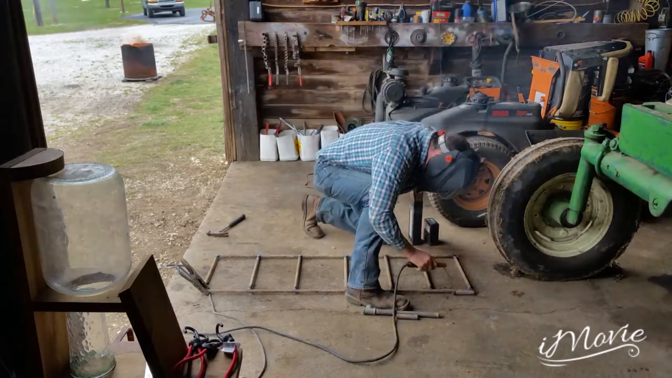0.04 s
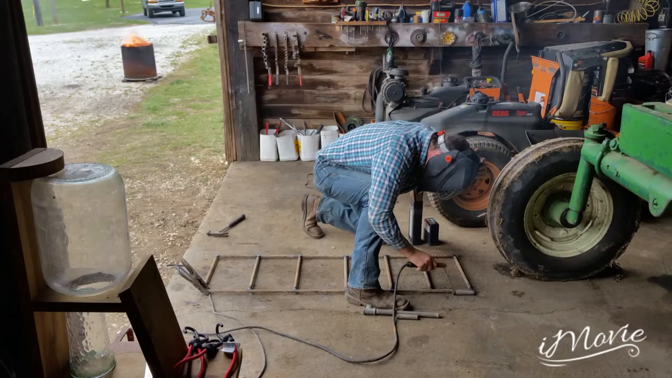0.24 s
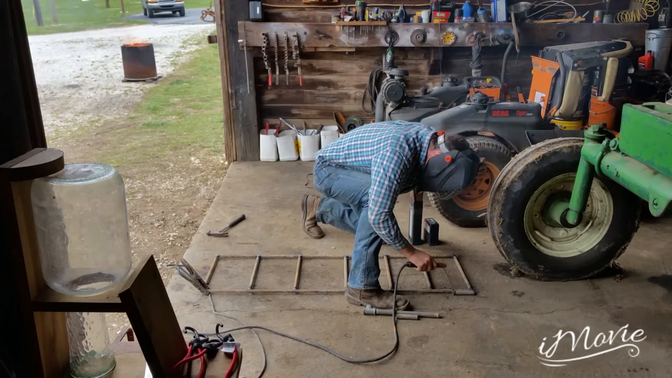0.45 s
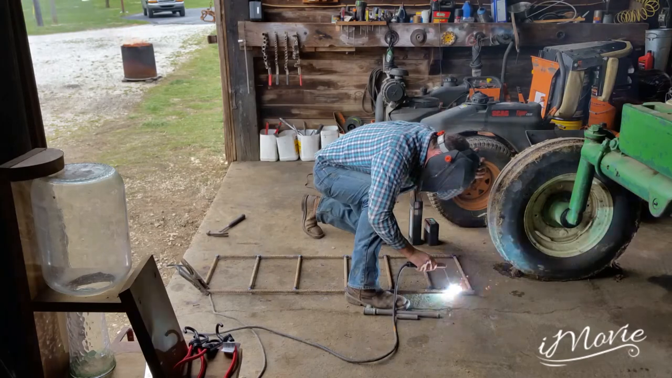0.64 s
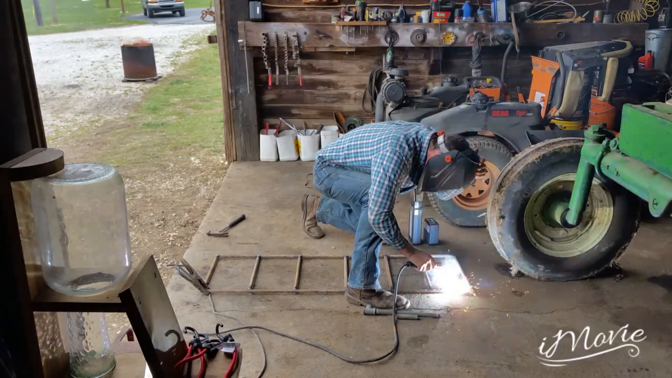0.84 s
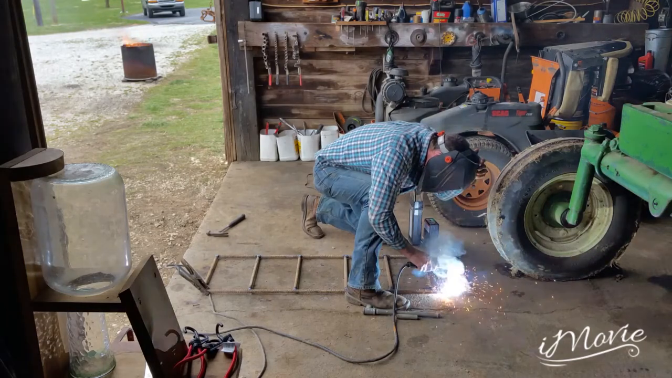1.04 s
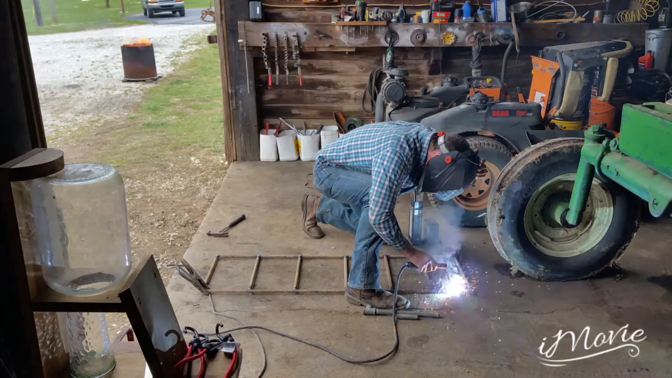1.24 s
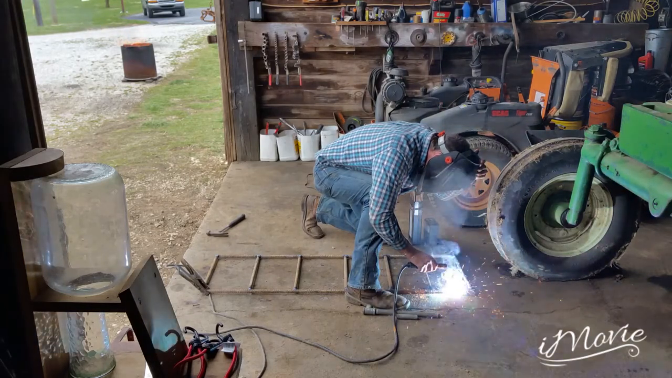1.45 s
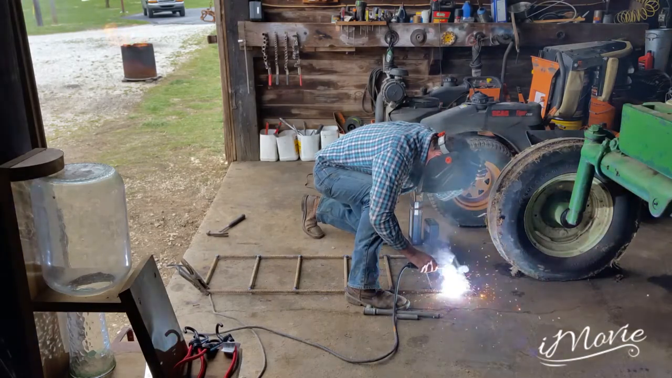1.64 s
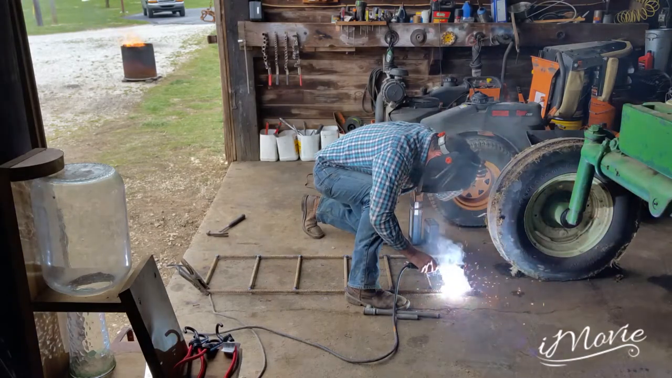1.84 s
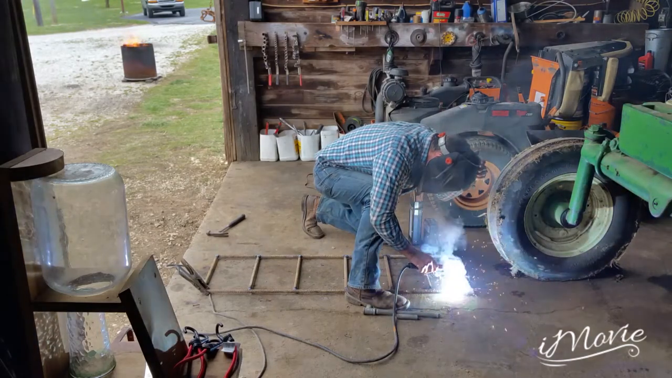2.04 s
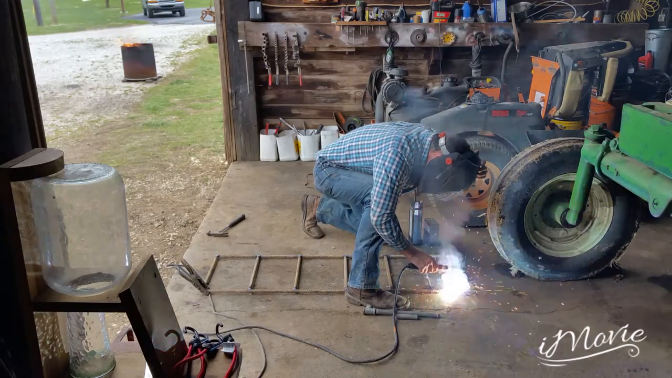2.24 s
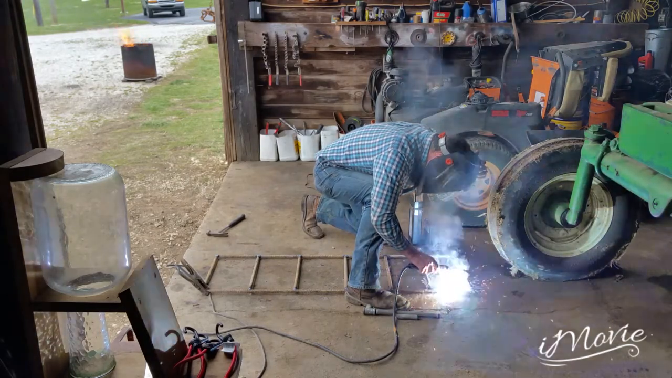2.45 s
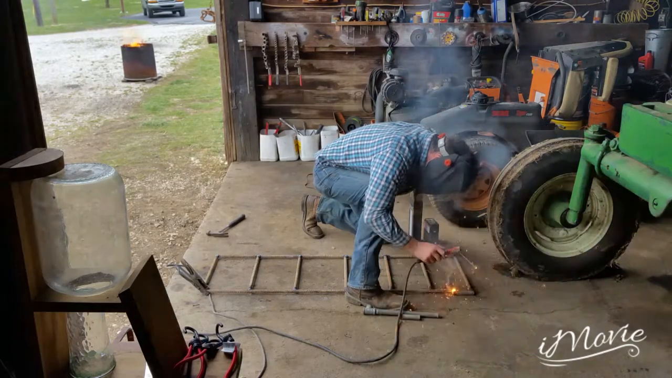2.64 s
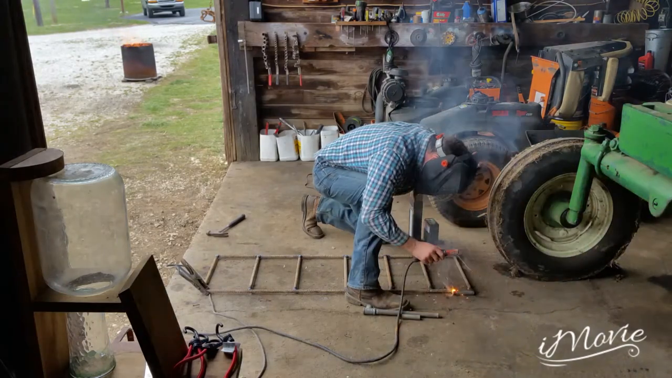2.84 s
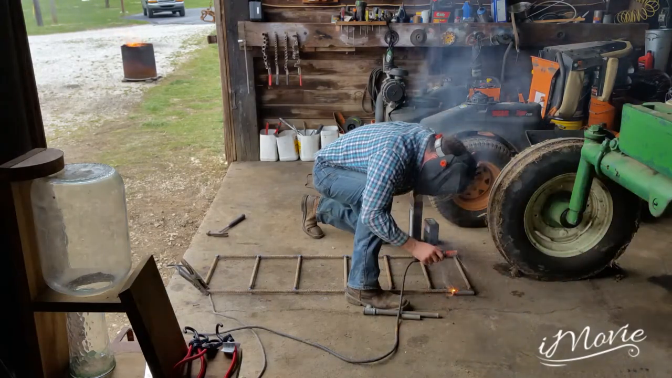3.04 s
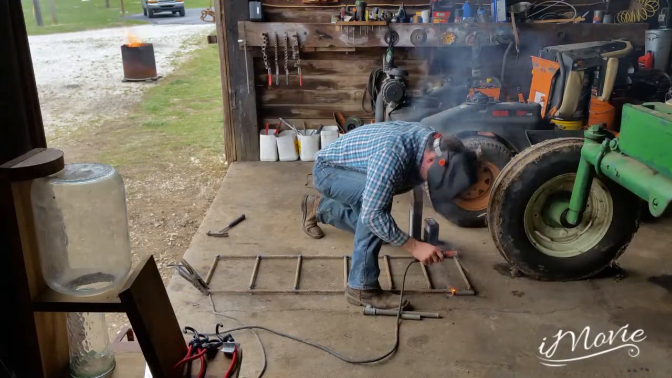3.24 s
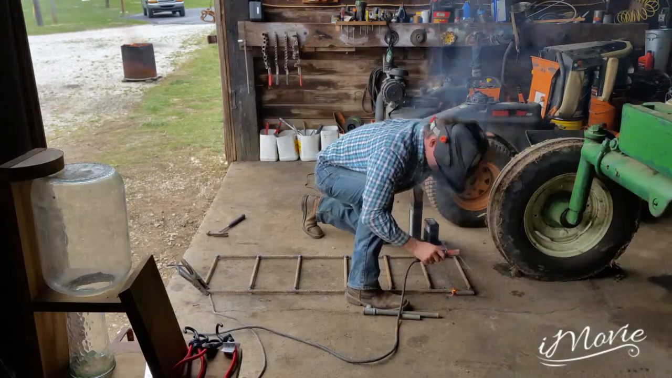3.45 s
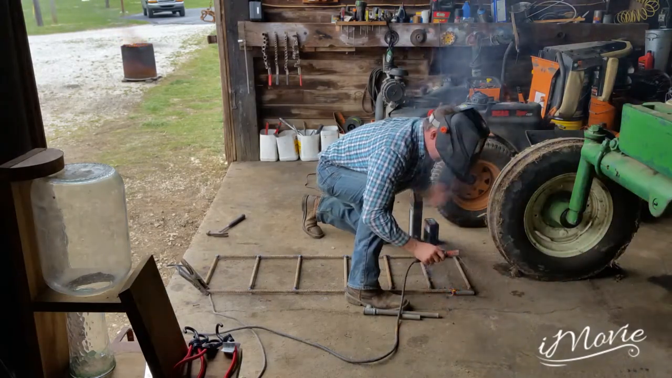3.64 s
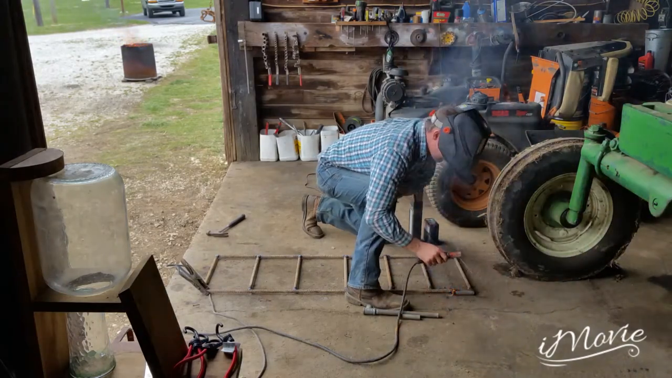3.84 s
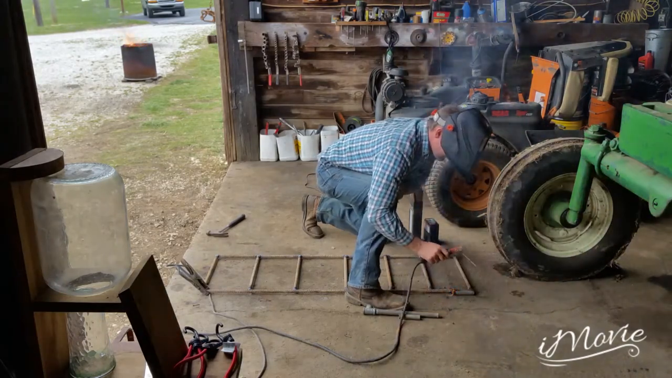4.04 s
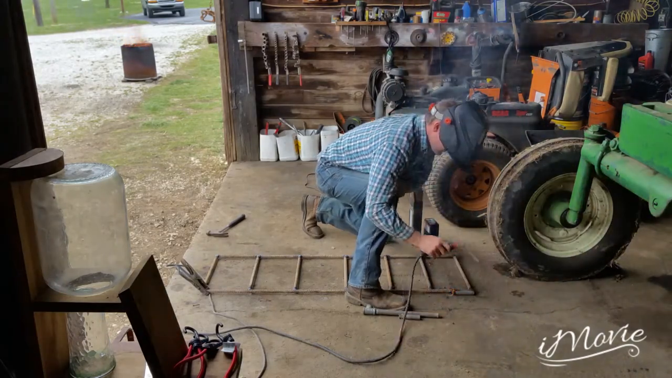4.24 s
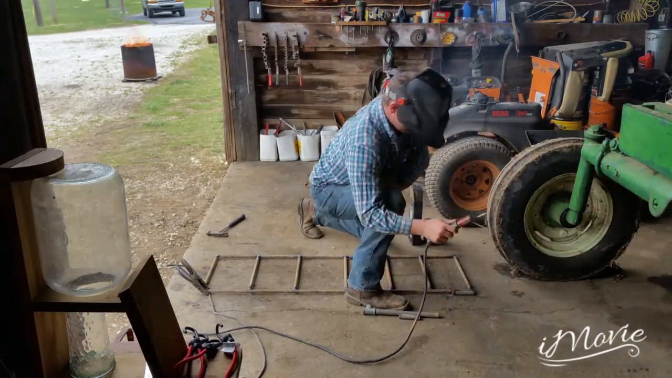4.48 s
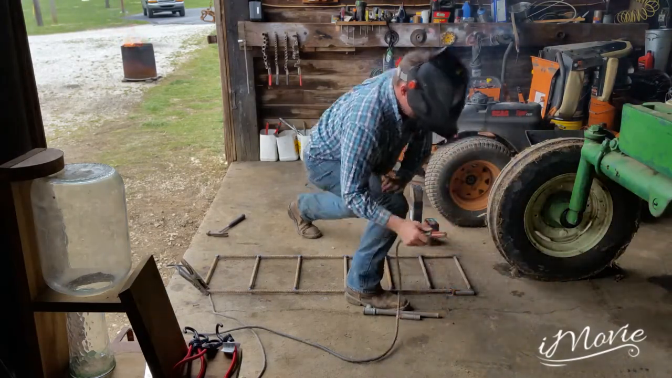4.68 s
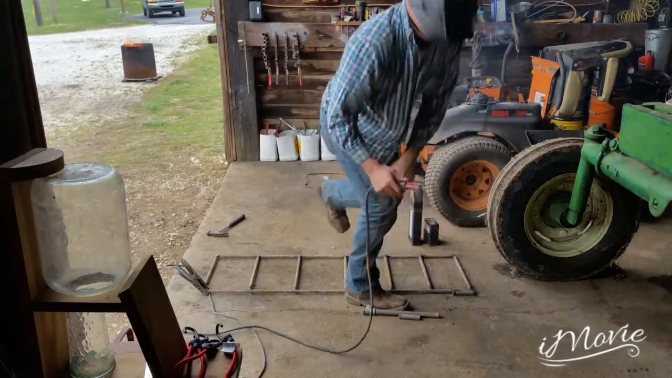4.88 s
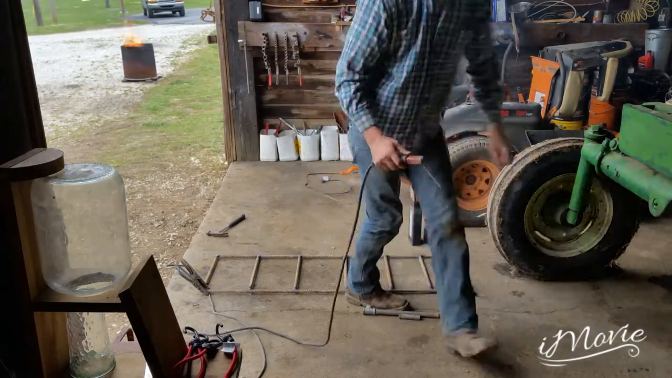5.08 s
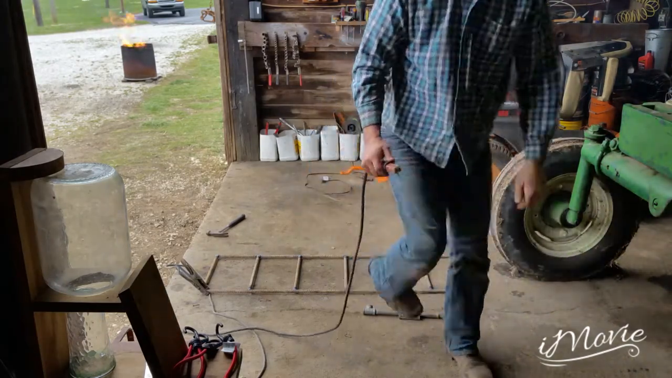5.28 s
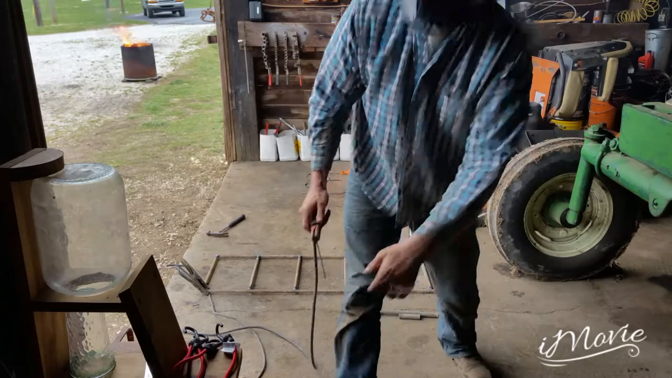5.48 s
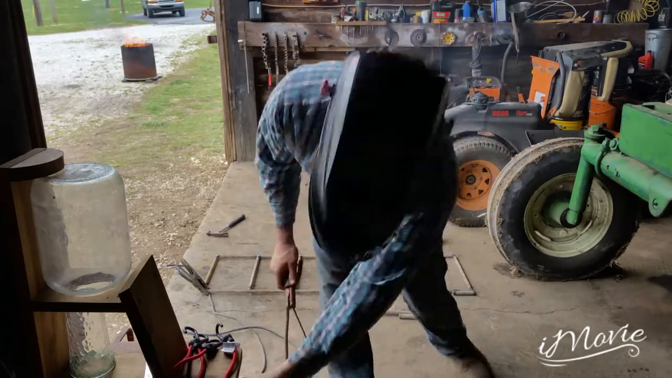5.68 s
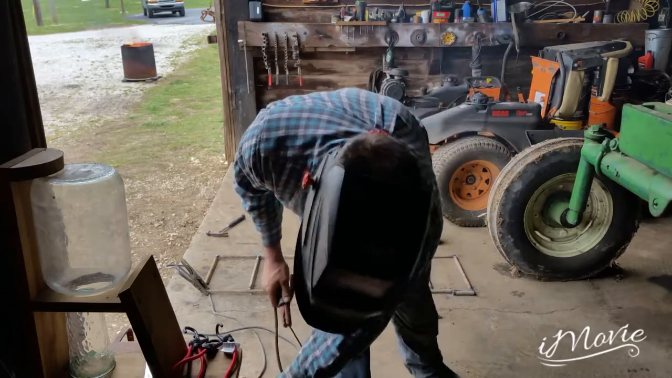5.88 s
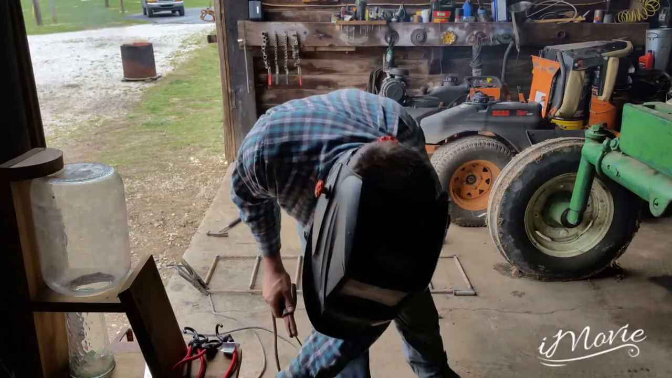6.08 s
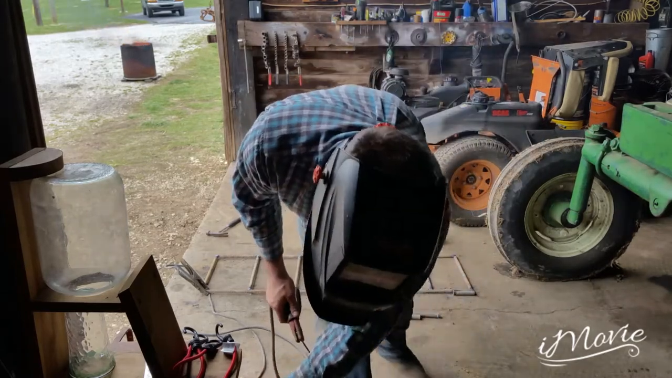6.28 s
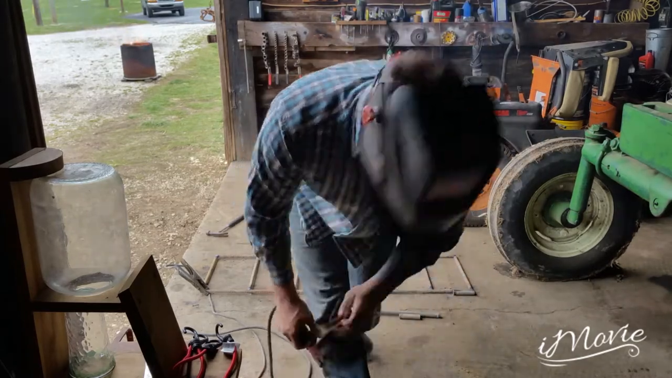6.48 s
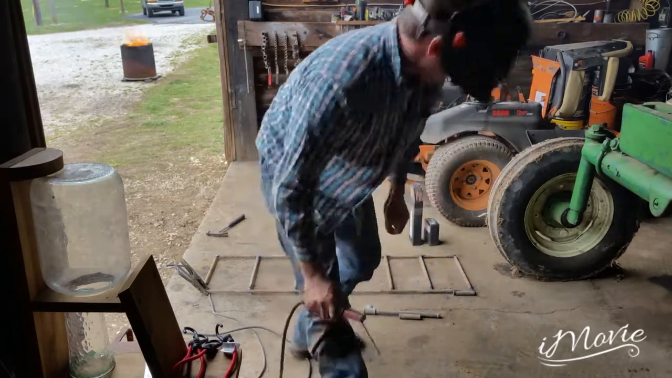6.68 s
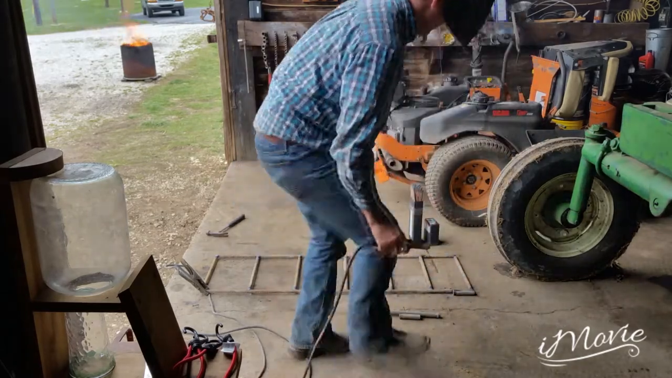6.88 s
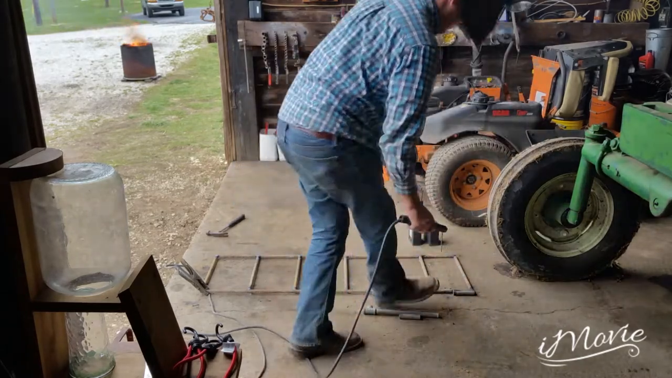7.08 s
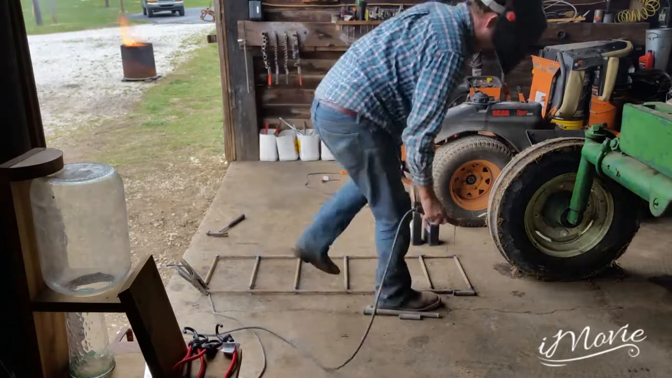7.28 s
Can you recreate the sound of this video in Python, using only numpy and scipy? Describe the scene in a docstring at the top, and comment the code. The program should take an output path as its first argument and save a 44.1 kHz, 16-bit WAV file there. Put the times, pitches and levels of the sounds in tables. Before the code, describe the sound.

From the start a welding transformer gives a steady low-to-mid electrical hum, with a fan's whirring tones and a soft rush of cooling air. At 0.63 seconds the arc strikes: a snap and rough sputter, a brief roaring flare near 0.78, then dense, raspy crackling pulsing at a fast mains buzz. From about 1.03 the bright fizz grows stronger. Irregular sharp pops spit throughout, notably near 1.3 and 1.9, while the hum is louder and the fan sags slightly in pitch. A last roaring flutter ends the arc at 2.52. The fan recovers and idle drone continues. Very faint scuffs of clothes, boots and cable come around 4.8, 5.2 and 5.45. At 5.95 and 6.10 two loud metal switch clacks strike close by, each with a dull rebound and short steel-case ring. Hum and fan run on to the end near 7.4, a faint lower throb growing.

```python
"""Stick welder in a wooden workshop

The transformer hums as a stack of sines; fan and motor whir as sines over a rush of filtered noise.
The struck arc is random sparks that swell with the mains, with drop bursts and noise flares up to its break.
Then come faint rustles of grainy noise as the worker gets up and turns the current switch two notches;
each notch is a clack of shaped noise with a dull rebound and ringing modes of the steel case."""
import sys
import numpy as np
from scipy import signal
from scipy.fft import rfft, irfft, next_fast_len
from scipy.io import wavfile
from scipy.ndimage import map_coordinates

SR = 44100
rng = np.random.default_rng(int(sys.argv[2]) if len(sys.argv) > 2 else 0)


def dump_mix(stems):
    """Bounce the given channels to the path in sys.argv[1] as a 16-bit WAV at rate SR."""
    frames = np.atleast_2d(stems).T  # one column per channel
    limited = np.clip(frames, -1, 1)  # hard clip at full scale
    pcm = np.round(limited * 32767).astype(np.int16)
    wavfile.write(sys.argv[1], SR, pcm)


N = 322812
TIME = np.arange(N) / SR

STRIKE_S, BREAK_S = 0.63, 2.521  # the arc burns between these times
MAINS_HZ = 60

# the core's two main partials: (multiple of the mains, idle level [dB], loaded level [dB],
# extra on the cold rod [dB], extra in a full surge [dB], left-right [dB])
CORE = [(4, -43.5, -35, 4, 9.5, 0), (8, -47, -50, 13, 11.5, 1)]
# heavy current on the cold rod, one row per main partial: (peak time [s], half length [s])
INRUSH = [(0.732, 0.1), (0.907, 0.17)]
# the current surges as the arc takes hold and before it breaks: (time [s], half length [s], strength [0-1])
SURGES = [(0.779, 0.0062, .55), (2.507, 0.018, 0.95)]
# the hum's weaker partials: (multiple of the mains, idle level [dB], loaded level [dB],
# left-right before the common shift [dB])
HUM_PARTIALS = [(12, -49.5, -46.5, 2), (16, -62.5, -58.5, 10), (20, -64, -50.5, 5), (32, -68, -60, 7)]
EASE_S, EASE_HALF_S, EASE_DB = 1.3, 0.072, -4.5  # the main partials ease briefly in mid-weld
THROB_DB, THROB_RISE_S = -46.5, 0.7  # a lower tone that grows against the hum once the switch is turned

# whirring tones of the fan, its blade tone first, and of a second motor (682 Hz) that slows less:
# (idle frequency [Hz], level [dB], left-right before the common shift [dB],
# idle left lead [rad], share of speed lost under load)
WHIR_TONES = [(409.5, -41, 9.5, 1.83, .012), (206, -58, 9.5, 0, 0.01207), (544, -54.5, -5, 0.13, .012),
              (682, -47.5, 11, -0.23, 0.003994), (823.4, -50, -5, 1, .012), (1225, -52, -7.5, 0.43, .012),
              (1685, -56, 0, 0, .012)]
# slow swells and fades of the blade tone: (time [s], half length [s], change [dB])
BLADE_SWELLS = [(4, 0.62, -2), (6.4, 0.33, 2.5), (7.1, 0.34, -3.5)]
BLADE_LOAD_DB = 1.5  # the blade tone is louder under load
# spectrum of the cooling air: (frequency [Hz], density [dB per Hz])
AIR = [(25, -31), (60, -18.5), (110, -11.5), (200, -3.5), (300, 1), (540, -2), (800, 2), (1050, -6),
       (1700, -5), (2800, -15), (6500, -19), (8000, -22.5), (14300, -25.5), (16000, -37)]
# resonances of the air's way through the case, and a bright peak near 14 kHz: (frequency [Hz], width [Hz], gain
# [dB])
DUCT = [(518, 103, 6.1), (697, 70, 5.4), (1297, 237, 6.4), (1717, 51, 2.6), (2395, 240, 5.5),
        (3490, 340, 3.7), (10160, 900, 1.9), (14100, 700, 2.5)]
AIR_DB = -38

# how hard the arc crackles as the hand guides the rod: (time [s], level [dB])
CRACKLE_LEVEL = [(0.65, -31), (0.694, -37), (0.704, -31), (1.02, -34.5), (1.632, -30.5), (2.154, -32),
                 (2.16, -34.5), (2.47, -31.5)]
# spectrum of the crackle: (frequency [Hz], density [dB per Hz])
CRACKLE = [(40, -50), (150, -46), (450, -1.5), (900, -6.5), (1300, -0.5), (2000, -1), (3000, -0.5),
           (4500, 0), (7000, -2.5), (9000, -4), (11000, -15), (15000, -35)]
# spectrum of the fizz: (frequency [Hz], density [dB per Hz])
FIZZ = [(300, -60), (6000, -13), (9000, -5), (11500, -1), (14200, 0.5), (15200, -7.5), (16200, -10)]
# colour of frame and floor: (frequency [Hz], width [Hz], gain [dB])
FRAME = [(1438, 113, 4.5), (1535, 89, -14), (1840, 200, 3), (2190, 170, -4), (2470, 140, 0.5),
         (2700, 220, 0.5), (3160, 230, 6), (3370, 100, -9), (3750, 280, 5.5), (4190, 330, -5.5),
         (6000, 200, -3), (6860, 230, 6), (7450, 300, -3)]
# how strongly the sparks follow the mains: (at the strike [dB], at the break [dB])
PULSE_DB = (2, 4)
CURRENT_LAG_S = 0.00043  # the arc current trails the mains voltage
# the fizz steps up once the rod is hot
HOT_S, HEATING_S, COLD_FIZZ_DB, HOT_FIZZ_DB = 1.03, 0.027, -36.5, -32
LIFT_S = 2.47  # the rod is drawn away and the fizz dies down

# the largest molten drops short the arc and burst:
# (time [s], snap level before the common gain [dB], crackle level before the common trim [dB])
DROPS = [(0.63, -19.5, -29), (0.7046, -20, -19.5), (0.8448, -19.5, -22), (0.9183, -21, -30),
         (1.049, -18, -36), (1.0758, -19, -34), (1.263, -15.5, -18), (1.301, -15.5, -38),
         (1.5168, -18, -28), (1.5677, -24, -26), (1.7168, -18, -29), (1.8091, -22, -26), (1.884, -18, -27),
         (1.901, -12, -26), (2.0351, -16, -22.5), (2.0925, -17, -31), (2.2337, -20, -31),
         (2.2915, -17, -25), (2.309, -17, -31), (2.3828, -18, -30), (2.4256, -15, -27), (2.45, -19, -29),
         (2.4836, -21, -26)]
# spectrum of the bursts: (frequency [Hz], density [dB per Hz])
DROP_BURST = [(40, -36), (200, -29), (900, -12), (3000, -2.5), (8000, 0), (13500, 5.5), (16000, -7)]
SHORT_S, SHORT_DB = 0.0094, -2  # a drop bridges the gap and muffles the arc just before it bursts

# the arc stretches and its gas flutters: (time [s], half length [s], roar level [dB], sputter level [dB])
FLARES = [(0.636, 0.0044, -39, -34), (0.763, 0.045, -41, -34), (0.748, 0.0027, -42, -34),
          (0.775, 0.006, -29, -32), (0.792, 0.0042, -37, -31), (2.49, 0.007, -45, -30),
          (2.511, 0.014, -28.5, -32)]
# spectrum of the roar: (frequency [Hz], density [dB per Hz])
ROAR = [(30, -32), (65, -20), (120, -3.5), (240, 8.5), (400, -6.5), (800, -3), (2000, -28)]
# spectrum of the sputter: (frequency [Hz], density [dB per Hz])
SPUTTER = [(40, -40), (200, -18), (500, 4.5), (700, 0.5), (1000, -2.5), (1350, 4.5), (1900, 2),
           (2500, -7.5), (3600, -9), (5100, -4.5), (6200, -22), (9000, -22)]

# clothes, boots and cable: (time [s], half length [s], centre [Hz], width [octaves], level [dB])
RUSTLES = [(3.225, .005, 9000, .8, -52), (4.797, .008, 3050, .04, -46), (4.833, .012, 5800, .04, -51),
           (5.196, 0.036, 4300, 0.45, -49.5), (5.2, .03, 3650, .03, -56), (5.195, .025, 4250, .05, -54),
           (5.195, .016, 10000, .7, -49), (5.448, .0035, 10000, 0.7, -40), (5.81, .03, 8000, .8, -59),
           (7.19, .01, 12000, .5, -55)]

# notches of the current switch, levels before the common clack gain:
# (time [s], snap level [dB], rebound time [s], rebound level [dB])
NOTCHES = [(5.9465, -15, 5.963, -29.5), (6.098, -15, 6.118, -23.5)]
# spectrum of the clack: (frequency [Hz], density [dB per Hz])
CLACK = [(30, -32), (100, -17), (250, -11), (500, -8), (900, 0), (1300, -7.5), (2300, -5), (3000, -7),
         (3800, -8), (5000, -10), (8000, -12.5), (13500, -16.5), (16000, -19)]
# broad resonances of the switch housing: (frequency [Hz], width [Hz], first notch [dB], second notch [dB])
HOUSING = [(526, 97, 6, 8), (960, 86, -1, 4), (2250, 200, 0, 3), (2560, 220, 3.5, 3.5),
           (2950, 330, -6.5, -1), (3520, 300, 5.5, -2), (3780, 300, 0, 5.5), (4400, 300, 1, -2),
           (4750, 300, 0, 3), (5800, 400, 5, -2), (6260, 450, 2, 4.5), (13600, 1400, 5, 2)]
# spectrum of the rebound: (frequency [Hz], density [dB per Hz])
REBOUND = [(40, -22), (110, -16), (260, -6.5), (700, 3), (1800, -3), (4000, -14), (12000, -30)]
# ringing of the steel case, relative to the snap level in NOTCHES:
# (frequency [Hz], t60 [s], first notch [dB], second notch [dB])
CASE = [(52, 0.61, -44, -38), (273, 0.41, -13.5, -19.5), (426, 0.14, -28, -8.5), (515, 0.25, -6, -9),
        (551, 0.61, -15, -23), (644, 0.28, -13, -13), (713, 0.15, -12, -4.5), (955, 0.23, -8, -5.5),
        (1455, .17, -26, -10), (1870, .18, -20, -13), (1990, .18, -17, -12), (2210, .2, -17, -11),
        (2580, .18, -15, -16), (3360, .16, -16, -24), (3520, 0.12, -7, -24), (3800, 0.15, -25, -14)]

# decay of the workshop: (frequency [Hz], t60 [s])
SHOP = [(100, 0.62), (500, 0.25), (2000, 0.19), (6000, 0.17), (14000, 0.12)]
# width of diffuse sound: (frequency [Hz], side-mid [dB])
WIDTH = [(40, -3), (130, -24), (260, -7), (600, -11.5), (1300, -3), (3000, -1), (7000, 0)]
# balance of the two ports: (frequency [Hz], left-right [dB])
PORTS = [(100, 1), (500, 2), (1300, -.5), (4500, 1.5), (10500, -1), (12400, -12), (14000, -17.5),
         (15800, -10)]
TOP_HZ = 15900  # band limit
# the sparks' delay at the left port, and the delay of their first echo
LEFT_LAG_S, ECHO_S = 0.00006, 0.00159
MIRROR_DB, SCATTER_DB = -11.5, -2  # clean and scattered part of that echo, relative to the direct sound


def amp(db):
    """Decibels to amplitude."""
    return 10 ** (np.asarray(db) / 20)


def unit(x):
    """Scale to rms 1; for a mid-side pair, by its mid."""
    return x / np.sqrt(np.mean(np.atleast_2d(x)[0] ** 2) + 1e-20)


def along(points, hz):
    """Read (Hz, value) points on a log frequency axis."""
    f, v = np.transpose(points)
    return np.interp(np.log(hz + 1), np.log(f + 1), v)


def bell(x, centre, width):
    """Gaussian bump of height 1."""
    return np.exp(-0.5 * ((x - centre) / width) ** 2)


def bumps(rows):
    """Sum of bumps in time from (s, half length s, height) rows."""
    return sum(height * bell(TIME, s, half) for s, half, height in rows)


def wobble(rate):
    """A smooth random curve, rate knots a second."""
    knots = rng.standard_normal(int(N * rate / SR) + 4)
    return map_coordinates(knots, [TIME * rate])


def filtered(x, response):
    """Multiply the spectrum of x by a response of frequency."""
    m = next_fast_len(x.shape[-1] + SR // 4)
    return irfft(rfft(x, m) * response(np.fft.rfftfreq(m, 1 / SR)), m)[..., :x.shape[-1]]


def coloured(pair, spectrum, resonances=()):
    """Give a mid-side pair its spectrum; the sides are shaped by WIDTH."""
    def response(hz):
        db = along(spectrum, hz)
        db = db + sum(gain * bell(hz, centre, width / 2) for centre, width, gain in resonances)
        return amp([db, db + along(WIDTH, hz)])
    return filtered(pair, response)


def noise(spectrum, resonances=()):
    """Diffuse mid-side noise, its mid at rms 1."""
    return unit(coloured(rng.standard_normal((2, N)), spectrum, resonances))


def tone(phase, pan_db, lead):
    """A sine as a mid-side pair, the left leading by lead radians; rms 1 when centred."""
    left = amp(pan_db / 2) * np.sin(phase + lead / 2)
    right = amp(-pan_db / 2) * np.sin(phase - lead / 2)
    return np.array([left + right, left - right]) / np.sqrt(2)


def add(track, s, sound):
    """Lay a sound into a track at time s."""
    part = track[..., round(s * SR):][..., :sound.shape[-1]]
    part += sound[..., :part.shape[-1]]


def load(rise, fall):
    """Arc load: ramps to 1 over rise seconds, then decays after the break with time constant fall."""
    return np.clip((TIME - STRIKE_S) / rise, 0, 1) * np.exp(-np.maximum(TIME - BREAK_S, 0) / fall)


def walls(x):
    """The diffuse answer of the workshop: decaying noise convolved with x, as a mid-side pair."""
    hz, t, z = signal.stft(rng.standard_normal((2, SR // 3)), SR, nperseg=256)
    decay = amp(-60 * t / along(SHOP, hz)[:, None])
    tail = signal.istft(z * decay, SR, nperseg=256)[1]
    return signal.fftconvolve(x[None], tail / np.linalg.norm(tail[0]), axes=1)[:, :N]


def in_shop(x, wet_db):
    """Mid-side pair: the direct sound from straight ahead, then the answer of the walls."""
    direct = np.array([x, 0 * x])
    return (direct + amp(wet_db) * walls(x)) / np.hypot(1, amp(wet_db))


def from_arc(x, wet_db):
    """Mid-side pair: sparks reach the right port first, echo off a nearby surface, then fill the shop."""
    direct = np.array([np.roll(x, round(LEFT_LAG_S * SR)), x])
    # random signs scatter the echo from sample to sample
    strength = amp(MIRROR_DB) + amp(SCATTER_DB) * rng.choice([-1, 1], (2, N))
    left, right = direct + np.roll(direct, round(ECHO_S * SR), axis=1) * strength
    pair = np.array([left + right, left - right]) / np.sqrt(2) + amp(wet_db) * walls(x)
    return pair / np.linalg.norm(amp([0, MIRROR_DB, SCATTER_DB, wet_db]))


def transformer(waver_db=2.5, fundamental_db=-17, throb_hz=225):
    """The core hums on even multiples of the mains, its levels shifting while it feeds the arc."""
    current, mains = load(rise=0.008, fall=0.018), 2 * np.pi * MAINS_HZ * TIME
    surge = bumps(SURGES)
    ease_db = EASE_DB * bell(TIME, EASE_S, EASE_HALF_S)
    out = 0
    for (order, idle_db, loaded_db, cold_db, surge_db, pan_db), (s, half) in zip(CORE, INRUSH):
        change_db = loaded_db - idle_db + cold_db * bell(TIME, s, half) + surge_db * surge + ease_db
        level = amp(idle_db + current * change_db)
        out = out + level * tone(order * mains, pan_db, 0)
    # the weak fundamental follows the upper of those partials
    out = out + level * amp(fundamental_db) * tone(2 * mains, 0, 0)
    for order, idle_db, loaded_db, pan_db in HUM_PARTIALS:
        phase = order * mains + 2 * np.pi * rng.random() + 0.067 * wobble(5.3)
        level = amp(idle_db + (loaded_db - idle_db) * current + waver_db * wobble(6))
        out = out + level * tone(phase, pan_db - 2.0, 0)
    growth = 1 - np.exp(-np.maximum(TIME - NOTCHES[0][0], 0) / THROB_RISE_S)
    throb = tone(2 * np.pi * throb_hz * TIME + 0.5 * wobble(3.4), 0, 0)
    return out + amp(THROB_DB) * growth * throb


def fan_and_motor(waver_db=1.4, flutter_rad=0.1):
    """Fan and motor tones sag as the arc pulls the supply down; air rushes through the case."""
    sag, drift = load(rise=0.291, fall=0.196), 0.000697 * wobble(2.01)
    blade_db = BLADE_LOAD_DB * sag + bumps(BLADE_SWELLS)
    out = 0
    for row, (hz, db, pan_db, lead, slip) in enumerate(WHIR_TONES):
        speed = 1 - slip * sag + drift
        phase = 2 * np.pi * np.cumsum(hz * speed) / SR + flutter_rad * wobble(15)
        swell_db = blade_db if row == 0 else waver_db * wobble(3.95)
        # a shift of pitch moves the room's standing waves over the two ports
        out = out + amp(db + swell_db) * tone(phase, pan_db - 3.0, lead * (1 - 0.68 * sag))
    return out + amp(AIR_DB + 0.52 * wobble(10)) * noise(AIR, DUCT)


def sparks(per_second, scatter_db, surge_db):
    """Tiny discharges at random times, of scattered size, rising and falling with surge_db."""
    fired = rng.random(N) < per_second / SR
    size = amp(scatter_db * np.clip(rng.standard_normal(N), -2.5, 2.5))
    return unit(fired * size * rng.choice([-1, 1], N) * amp(surge_db))


def arc(unrest_db=1.5, spit_db=2.0, burst_db=-2, burst_s=0.006, lift_db=-8, shimmer_db=1.5):
    """Crackle and fizz swell twice per mains cycle; each large drop dulls them, then sets off crackle."""
    pulse_db = np.interp(TIME, [STRIKE_S, BREAK_S], PULSE_DB)
    pulse = np.sin(2 * np.pi * 2 * MAINS_HZ * (TIME - CURRENT_LAG_S))
    surge_db = pulse_db * pulse + unrest_db * wobble(90) + spit_db * wobble(500)
    shorted = sum(bell(TIME, s - SHORT_S / 2, SHORT_S / 2) for s, *_ in DROPS)
    burning = load(rise=0.0035, fall=0.0034) * amp(SHORT_DB * shorted)

    steady_db = np.interp(TIME, *np.transpose(CRACKLE_LEVEL))
    bursts = sum(amp(db + burst_db) * (TIME >= s) * np.exp(-np.abs(TIME - s) / burst_s)
                 for s, _, db in DROPS)
    crackle_level = np.hypot(burning * amp(steady_db), bursts)
    crackle = crackle_level * sparks(per_second=3500, scatter_db=5.5, surge_db=surge_db)

    heat = np.clip((TIME - HOT_S) / HEATING_S + 0.5, 0, 1)
    fizz_db = COLD_FIZZ_DB + (HOT_FIZZ_DB - COLD_FIZZ_DB) * heat
    fizz_db = fizz_db + lift_db * np.interp(TIME, [LIFT_S, BREAK_S], [0, 1])
    fizz = burning * amp(fizz_db) * sparks(per_second=6000, scatter_db=7.0, surge_db=surge_db)

    body = unit(coloured(from_arc(crackle, wet_db=1.0), CRACKLE, FRAME))
    top = coloured(from_arc(fizz, wet_db=4.5), FIZZ)
    # the brightest part of the fizz flares and fades against the rest
    bright = filtered(top, lambda hz: bell(hz, 13800, 1100))
    shimmer = amp(shimmer_db * wobble(12.04))
    top = unit(bright * shimmer + (top - bright) / shimmer)
    return np.std(crackle) * body + np.std(fizz) * top


def pops(life_s=0.001, level_db=9, cluster_db=5):
    """Each bursting drop is one sharp snap and a short spiky cluster after it."""
    track, t = np.zeros(N), np.arange(SR // 100) / SR
    for s, db, _ in DROPS:
        cluster = rng.laplace(size=len(t)) * np.exp(-t / life_s)
        burst = amp(cluster_db) * cluster / np.linalg.norm(cluster)
        burst[0] = 1  # the snap
        add(track, s, amp(db + level_db) * burst)
    return coloured(from_arc(track, wet_db=0), DROP_BURST)


def flares():
    """A long arc roars and sputters as noise; a weaker flutter lasts through the whole weld."""
    burning = load(rise=0.005, fall=0.015)
    roar = sum(amp(db) * bell(TIME, s, half) for s, half, db, _ in FLARES) + amp(-51.0) * burning
    sputter = sum(amp(db) * bell(TIME, s, half) for s, half, _, db in FLARES) + amp(-45.0) * burning
    lit = load(rise=0.0047, fall=0.1)
    grain = unit(amp(0.91 * wobble(300)) * noise(SPUTTER, FRAME))
    return lit * (roar * noise(ROAR) + sputter * grain)


def rustles():
    """Brief grainy scuffs of band-limited noise as the worker gets up and walks."""
    out, t = np.zeros((2, N)), np.arange(SR // 3) / SR
    for s, half, centre_hz, octaves, db in RUSTLES:
        grains = rng.laplace(size=(2, len(t)))
        scuff = unit(filtered(grains, lambda hz: bell(np.log2(hz + 1), np.log2(centre_hz), octaves)))
        add(out, s - t.mean(), amp(db) * bell(t, t.mean(), half) * scuff)
    return out


def switch(snap_s=0.0047, rattle_s=0.014, rattle_db=-11, slide_db=-21, rebound_s=0.0068):
    """The sprung contact slides off its cam, snaps into the notch, rebounds dully and rings the case."""
    clacks, thuds, rings = 0, np.zeros(N), np.zeros((2, N))
    t = np.arange(SR // 2) / SR
    rise = 1 - np.exp(-t / 0.0015)
    blow = rise * (np.exp(-t / snap_s) + amp(rattle_db) * np.exp(-t / rattle_s))
    for notch, (s, db, back_s, back_db) in enumerate(NOTCHES):
        snap = np.zeros(N)
        slide = np.exp(-t / 0.0025) * rng.standard_normal(len(t))
        add(snap, s - 0.002, amp(db + slide_db) * slide)
        add(snap, s, amp(db) * blow * rng.standard_normal(len(t)))
        housing = [(hz, width, notch_db[notch]) for hz, width, *notch_db in HOUSING]
        clacks = clacks + coloured(in_shop(snap, wet_db=-1), CLACK, housing)
        thud = rise * np.exp(-t / rebound_s) * rng.standard_normal(len(t))
        add(thuds, back_s, amp(back_db) * thud)
        for hz, t60, *mode_db in CASE:
            decay = amp(db + mode_db[notch] - 60 * t / t60)
            # mid and side ring at phases of their own
            mode = np.sin(2 * np.pi * (hz * t + rng.random((2, 1)))) * amp([[0], [along(WIDTH, hz)]])
            add(rings, s, decay * (1 - np.exp(-t / 0.0048)) * mode)
    rebounds = coloured(in_shop(thuds, wet_db=2), REBOUND)
    return amp(16.5) * (clacks + rebounds) + rings


def scene():
    """Sum all sources as mid and side, then turn them into left and right."""
    mid, side = transformer() + fan_and_motor() + arc() + pops() + flares() + rustles() + switch()
    return np.array([mid + side, mid - side])


def record(dry):
    """The left port is dull at the top, the right one bright; nothing is kept above the band limit."""
    def response(hz):
        ratio = amp(along(PORTS, hz))
        balance = np.array([ratio, np.ones_like(hz)]) * np.sqrt(2 / (1 + ratio ** 2))
        return balance * (hz < TOP_HZ)
    return filtered(dry, response)


dry = scene()
out = record(dry)
dump_mix(out)
```